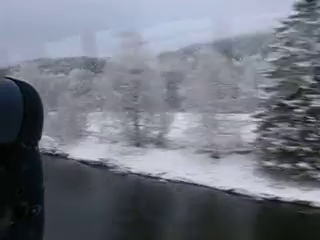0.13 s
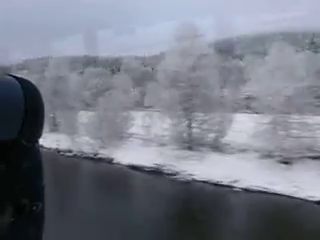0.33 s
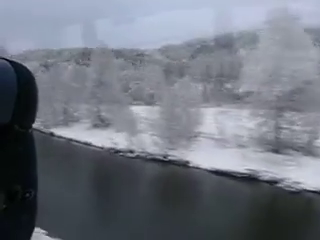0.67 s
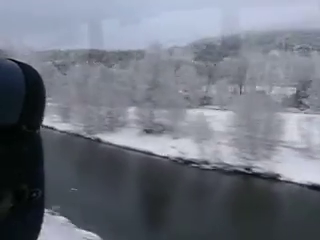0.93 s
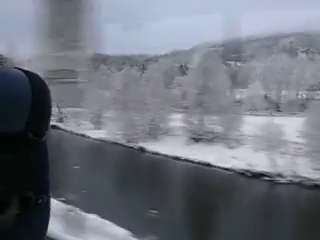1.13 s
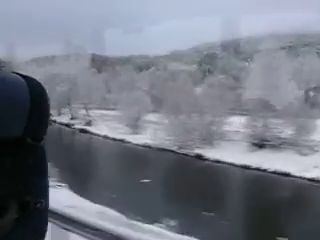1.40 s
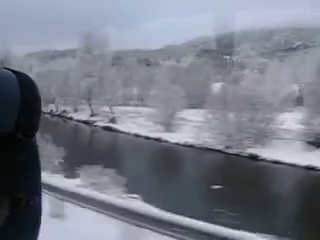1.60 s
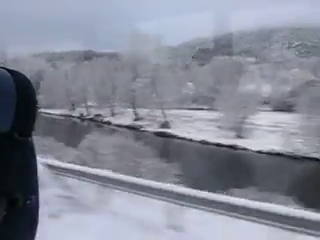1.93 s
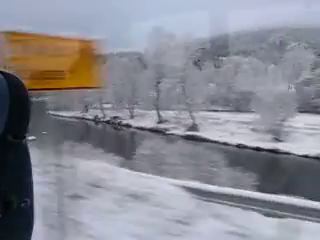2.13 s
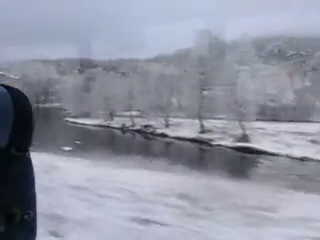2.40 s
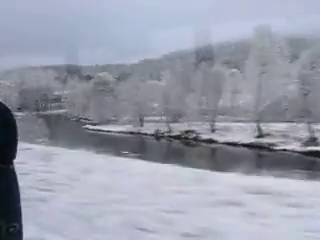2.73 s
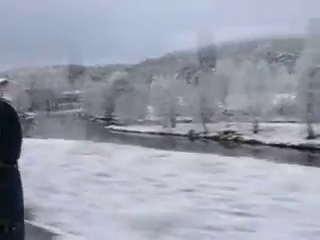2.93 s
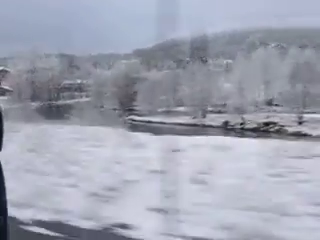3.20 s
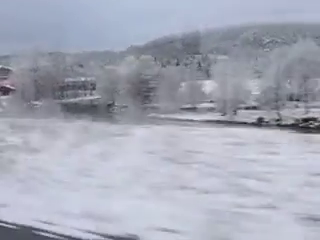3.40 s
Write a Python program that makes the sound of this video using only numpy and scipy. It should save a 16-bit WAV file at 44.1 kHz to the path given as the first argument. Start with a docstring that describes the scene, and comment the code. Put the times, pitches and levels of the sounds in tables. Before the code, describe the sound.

After a brief silence, heavy low bus rumble runs steadily to the end, with uneven road roar, thin whine and spray hiss; two small bright rattling ticks come later, in a boomy enclosed cabin.

```python
"""Bus cruising on a winter road, from a window seat

The body rumbles, the tyres roar through the cabin's resonances and air and spray hiss: all are shaped noise.
The drivetrain whines with sines on a wavering pitch that sags, then partly recovers; a fan sings faintly.
A loose fitting ticks twice in short bright bursts of noise.
The recorder is silent for a moment first; its limiter ducks everything under the rumble's peaks."""
import sys
import numpy as np
from scipy.fft import rfft, irfft, next_fast_len
from scipy.io import wavfile
from scipy.ndimage import uniform_filter1d, minimum_filter1d, map_coordinates

SR = 44100
rng = np.random.default_rng(int(sys.argv[2]) if len(sys.argv) > 2 else 0)


def dump(signal):
    """Clip the signal to [-1, 1] and save it as 16-bit WAV at the path in sys.argv[1]."""
    limited = np.clip(np.atleast_2d(signal).T, -1, 1)
    pcm = np.round(limited * 32767).astype(np.int16)
    wavfile.write(sys.argv[1], SR, pcm)


N = 156555  # length [samples]


def amp(db):
    """Decibels to gain."""
    return 10 ** (np.asarray(db) / 20)


def unit(x):
    """Scale to rms 1."""
    return x / np.sqrt(np.mean(x ** 2) + 1e-20)


def curve(rows):
    """Join (time [s], value) points by straight lines, one value per sample."""
    return np.interp(np.arange(N) / SR, *np.transpose(rows))


def wobble(rate):
    """A smooth random curve through normally distributed knots, rate knots a second."""
    knots = rng.standard_normal(1024)
    return map_coordinates(knots, [np.arange(N) * rate / SR], mode="wrap")


def filtered(x, response):
    """Multiply the spectrum of x by a response of frequency [Hz]."""
    m = next_fast_len(N + 8192)
    gain = response(np.fft.rfftfreq(m, 1 / SR))
    return irfft(rfft(x, m) * gain, m)[:N]


def noise(spectrum):
    """Noise of rms 1 with a (frequency [Hz], level [dB]) spectrum, falling away beyond its ends."""
    f, db = np.transpose(spectrum)
    f = np.r_[f[0] / 2, f, f[-1] * 2]
    db = np.r_[-120, db, -120]

    def response(hz):
        return amp(np.interp(np.log(hz + 1), np.log(f + 1), db))

    return unit(filtered(rng.standard_normal(N), response))


def tone(hz):
    """A sine of rms 1 on a pitch curve [Hz], from a random phase."""
    cycles = np.cumsum(hz) / SR + rng.random()
    return np.sqrt(2) * np.sin(2 * np.pi * cycles)


def rumble():
    """Engine and road shake the body of the bus: low noise of slowly changing level."""
    # swell of the rumble: (time [s], level [dB])
    rumble_level = [(.12, -14), (.45, -14), (1.2, -14), (2.0, -13.5), (2.5, -15), (3.0, -15.5), (3.5, -13)]
    # spectrum of the shaking body: (frequency [Hz], relative density [dB per Hz])
    rumble_spectrum = [(6, -17), (14, 5.5), (21, 1), (29, 1), (42, 0.5), (53, -5.5), (67, -2), (80, -7),
                       (100, -11), (125, -17.5), (200, -42), (400, -83.5)]
    return amp(curve(rumble_level)) * noise(rumble_spectrum)


def tyres():
    """Road roar, uneven with the surface, and the cabin resonances that it rings."""
    # swell of the roar, before a 0.5 dB lift: (time [s], level [dB])
    roar_level = [(0.12, -25.5), (0.22, -29.5), (0.35, -27), (0.6, -28.5), (0.9, -30.9), (1.3, -30.5),
                  (1.62, -27.5), (1.85, -32), (1.97, -28.5), (2.2, -30.5), (2.68, -30.5), (2.8, -27),
                  (2.86, -28.5), (3.0, -30.5), (3.09, -27.0), (3.17, -31), (3.5, -27)]
    # spectrum of the roar: (frequency [Hz], relative density [dB per Hz])
    roar_spectrum = [(70, -27), (130, 1), (185, 1), (260, -6), (400, -8), (510, -10.5), (700, -15),
                     (900, -19), (1100, -29), (2000, -57)]
    # cabin resonances: (frequency [Hz], width of one resonator [Hz], level about which it swells [dB])
    cabin = [(132.4, 11, -36), (169.6, 30, -39), (336.2, 32, -44), (373, 15, -48.5), (579, 60, -47)]
    level_db = curve(roar_level)
    unevenness_db = 0.65 * wobble(35)
    roar = amp(level_db + 0.5 + unevenness_db) * noise(roar_spectrum)
    swell_db = level_db - level_db.mean()
    for fc, width, db in cabin:
        def resonance(f):  # two equal resonators in series
            return (f * width / (fc * fc - f * f + 1j * f * width)) ** 2

        ring = filtered(rng.standard_normal(N), resonance)
        roar = roar + amp(db + swell_db) * unit(ring)
    return roar


def drivetrain():
    """A wavering gear whine, a rough hum an octave below and an overtone an octave above."""
    # pitch of the whine, before its waver: (time [s], pitch [Hz])
    whine_pitch = [(.1, 442), (.45, 442.5), (1.0, 440.3), (1.5, 438.6), (2.0, 438.4), (2.5, 434.3),
                   (3.0, 436.8), (3.5, 438)]
    # whine, before its random flutter: (time [s], level [dB])
    whine_level = [(.15, -41), (.37, -32.5), (.85, -42), (1.1, -35), (1.5, -35.5), (1.85, -48),
                   (2.2, -37.5), (2.52, -33), (2.9, -40), (3.15, -42), (3.5, -39)]
    # overtone, before its random flutter: (time [s], level [dB])
    overtone_level = [(.1, -56), (.9, -52.5), (1.55, -48), (2.1, -54), (3.5, -55.5)]
    hz = curve(whine_pitch) + 2.8 * wobble(30)
    whine = amp(curve(whine_level) + 2.6 * wobble(22)) * tone(hz)
    rough_hz = hz / 2 + 4 * wobble(25)
    hum = amp(-39 + 3 * wobble(18)) * tone(rough_hz)
    overtone = amp(curve(overtone_level) + 3.5 * wobble(13)) * tone(2 * hz)
    return whine + hum + overtone


def hiss():
    """Air and road spray: unsteady noise, mostly from 1 to 4 kHz."""
    # swell of the hiss, before a 1.5 dB lift: (time [s], level [dB])
    hiss_level = [(.12, -45.2), (.22, -45.8), (.37, -42.3), (.68, -43.8), (.8, -45.3), (1.1, -44.7),
                  (1.55, -43), (1.88, -45.6), (1.97, -44.6), (2.42, -45.3), (2.58, -43), (2.68, -45.6),
                  (2.8, -42.7), (2.86, -44.8), (3.0, -45.3), (3.09, -42.9), (3.16, -46.5), (3.25, -43.7),
                  (3.5, -43.8)]
    # spectrum of the hiss: (frequency [Hz], relative density [dB per Hz])
    hiss_spectrum = [(500, -21), (1000, 3.5), (1500, 3), (2000, -0.5), (2500, -0.5), (3100, 1), (4000, -4),
                     (5200, -10), (5800, -20)]
    return amp(curve(hiss_level) + 1.5) * noise(hiss_spectrum)


def ticks():
    """A loose fitting gives short bright ticks: noise with a fast attack and exponential decay."""
    # ticks: (onset time [s], level before attack and decay [dB])
    tick_times = [(2.2125, -38.5), (2.3815, -31.5)]
    # colour of a tick: (frequency [Hz], relative level [dB])
    tick_colour = [(1500, -20), (3000, -5), (4000, -1), (4800, 0), (6000, -9)]
    attack_s, t60_s = .0006, .022  # attack time constant; time to fall by 60 dB
    out = np.zeros(N)
    for onset_s, db in tick_times:
        t = np.maximum(np.arange(N) / SR - onset_s, 0)
        attack = 1 - np.exp(-t / attack_s)  # zero until the onset
        decay = amp(db - 60 * t / t60_s)
        out += decay * attack * noise(tick_colour)
    return out


def fan():
    """Thin, nearly steady tones of the ventilation, drifting in pitch together."""
    # fan tones, before drift and flutter: (frequency [Hz], level [dB])
    fan_tones = [(1721.4, -56.8), (1823.2, -63.5)]
    drift = 1 + 0.00068 * wobble(4)
    return sum(amp(db + 1.2 * wobble(7)) * tone(hz * drift) for hz, db in fan_tones)


def scene():
    """Everything heard from a window seat."""
    return (rumble() + tyres() + drivetrain() + hiss() + ticks() + fan())[None]


def record(dry):
    """A look-ahead limiter ducks the peaks, the input stage rounds what is left; the band is narrow."""
    x = dry[0]
    limit_db, hold_s, look_s = -8, 0.02, 0.003
    clip_db, clip_knee = -7, 3.7  # ceiling; a higher knee rounds more abruptly
    start_s, top_hz = .072, 5900

    needed = np.minimum(1, amp(limit_db) / (np.abs(x) + 1e-9))
    look, hold = int(look_s * SR), int(hold_s * SR)
    held = minimum_filter1d(needed, look + hold, origin=hold // 2 - 1)
    x = x * uniform_filter1d(held, look)  # averaging smooths the gain steps

    x = x / (1 + np.abs(x / amp(clip_db)) ** clip_knee) ** (1 / clip_knee)
    running = np.clip((np.arange(N) / SR - start_s) / .002, 0, 1)  # silent, then a 2 ms fade-in
    return filtered(x * running, lambda hz: 1 / np.sqrt(1 + (hz / top_hz) ** 80))[None]


dry = scene()
out = record(dry)
dump(out)
```